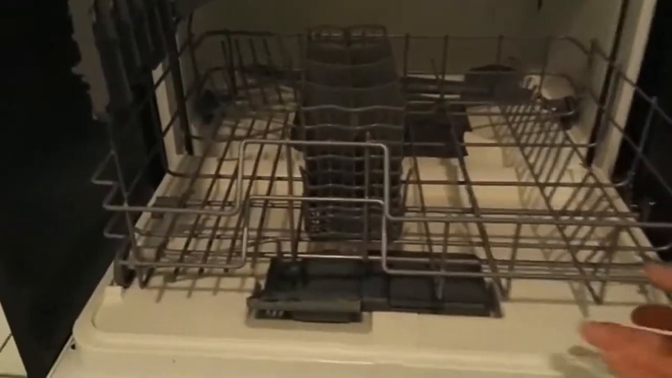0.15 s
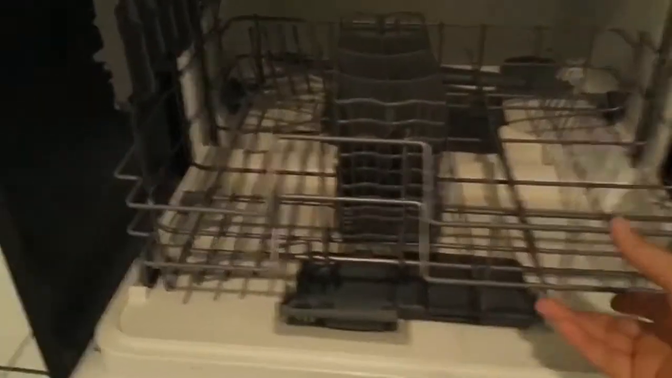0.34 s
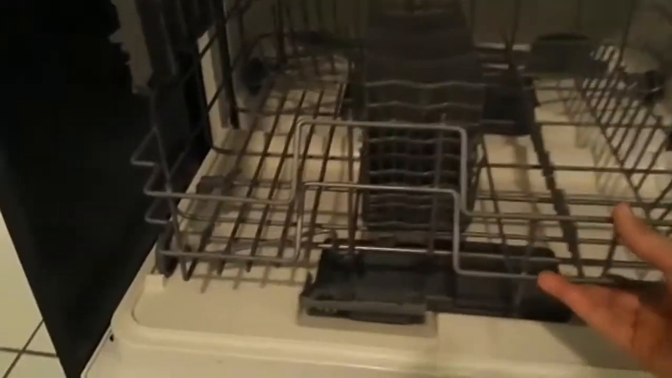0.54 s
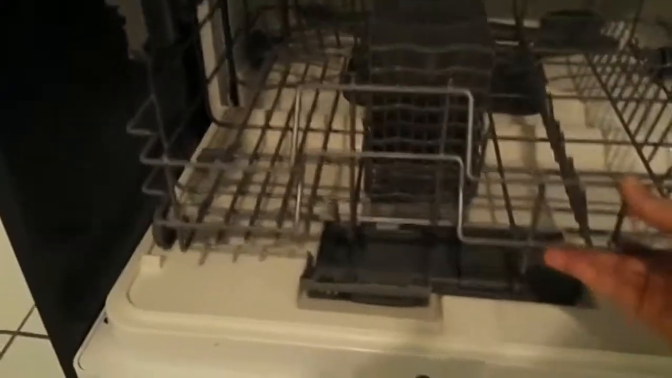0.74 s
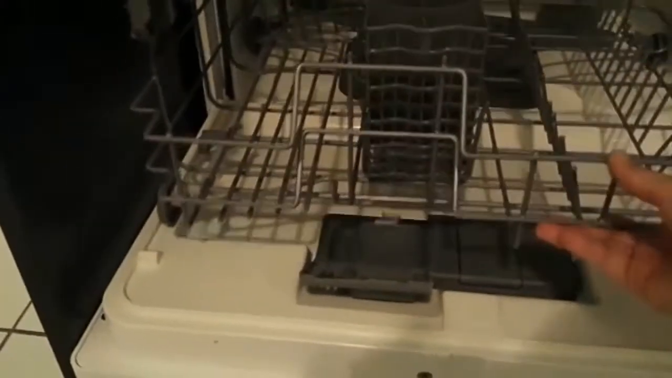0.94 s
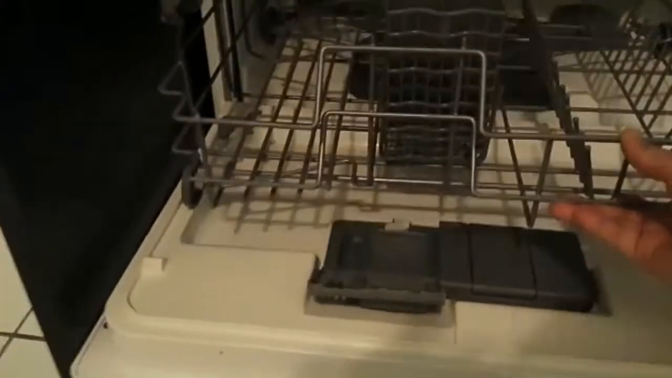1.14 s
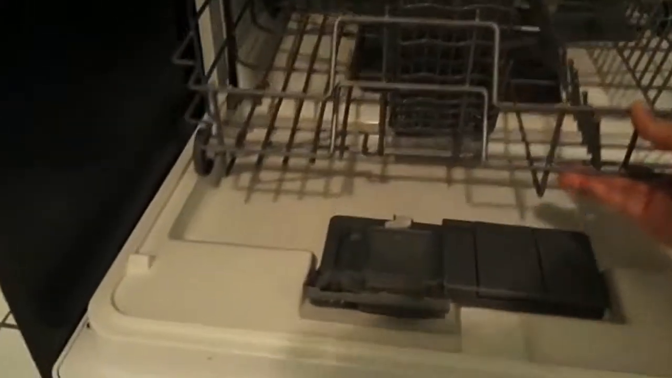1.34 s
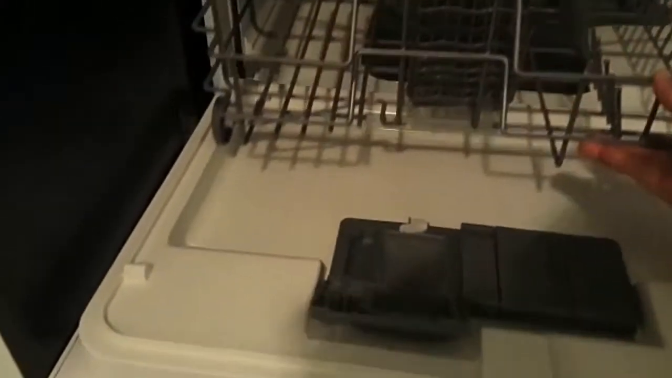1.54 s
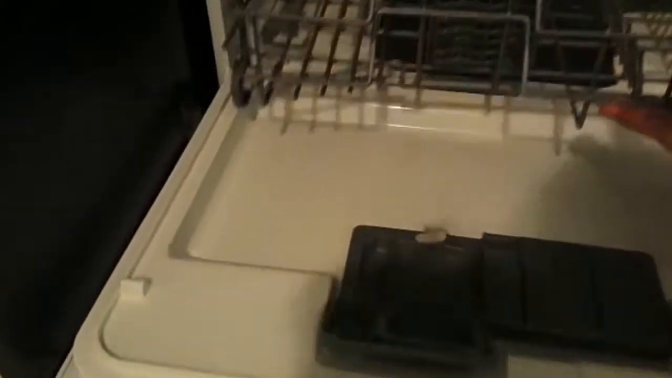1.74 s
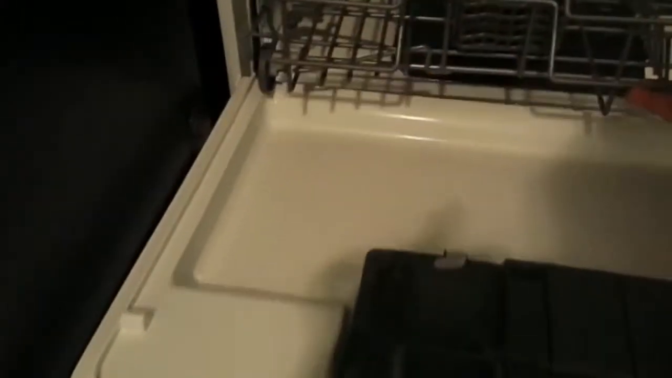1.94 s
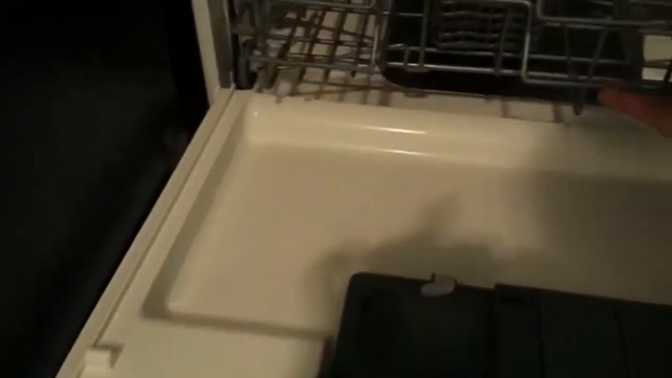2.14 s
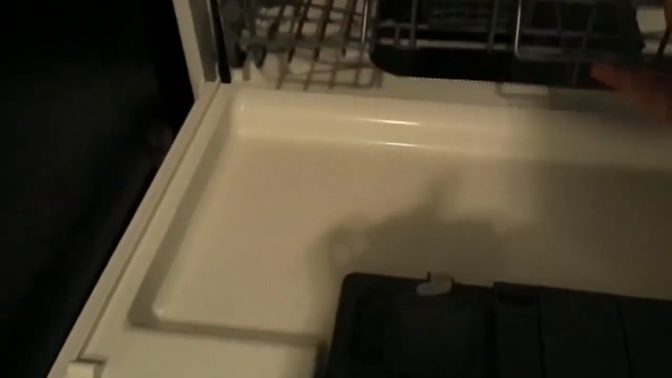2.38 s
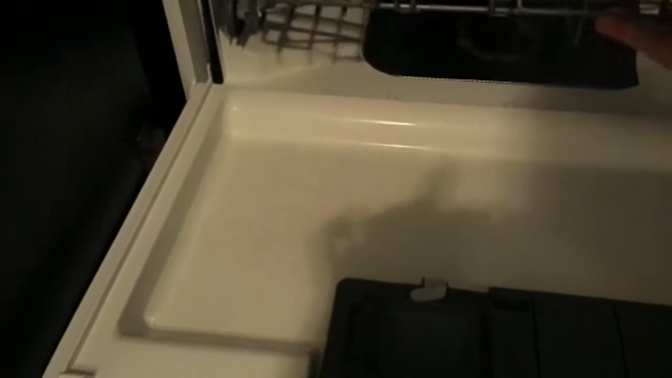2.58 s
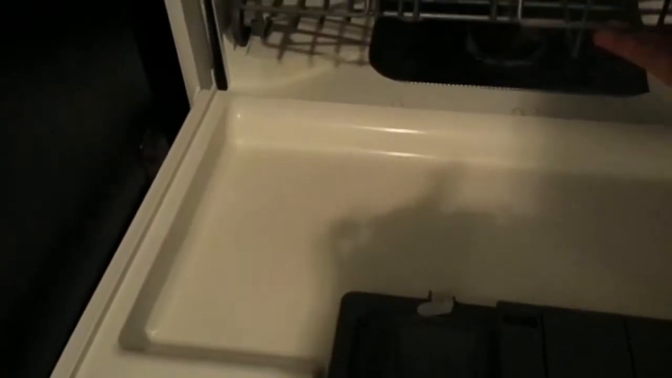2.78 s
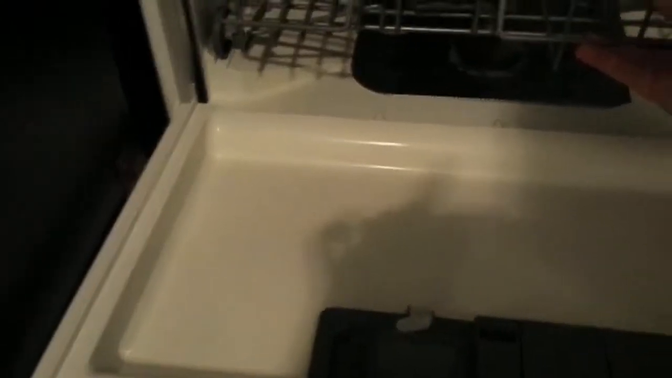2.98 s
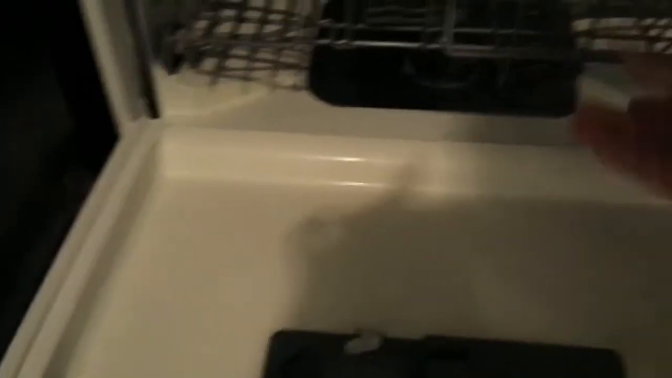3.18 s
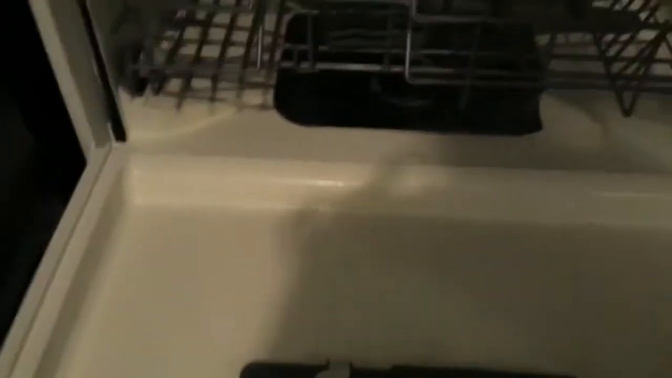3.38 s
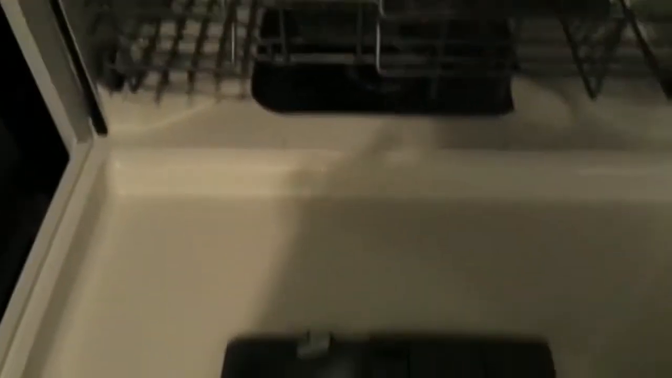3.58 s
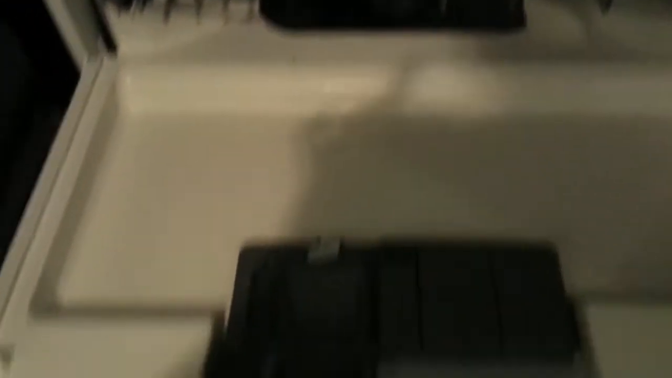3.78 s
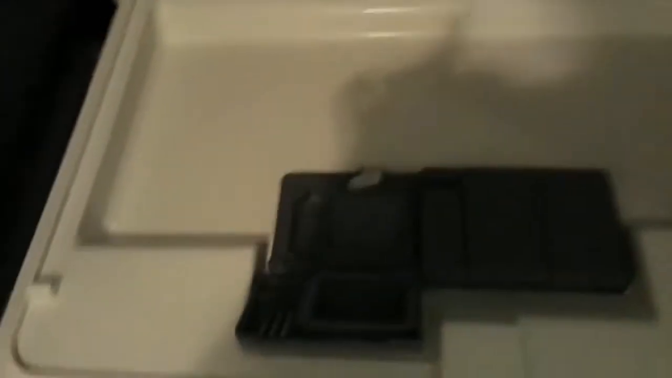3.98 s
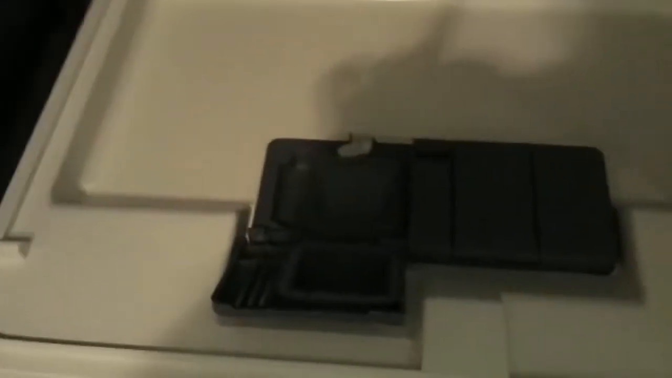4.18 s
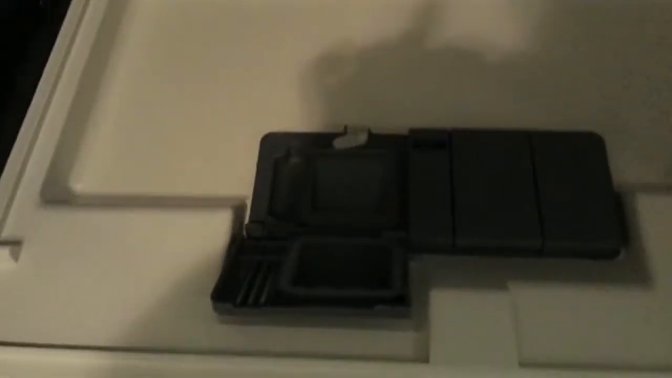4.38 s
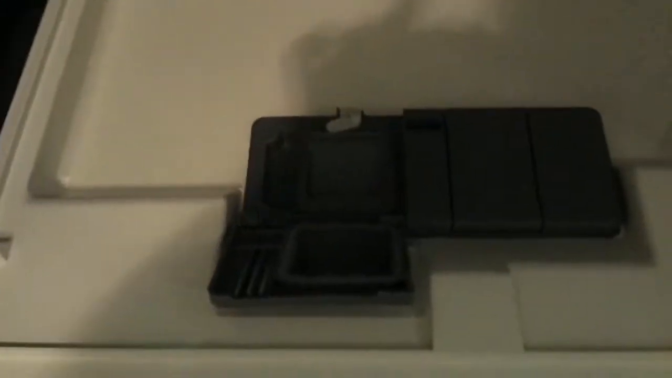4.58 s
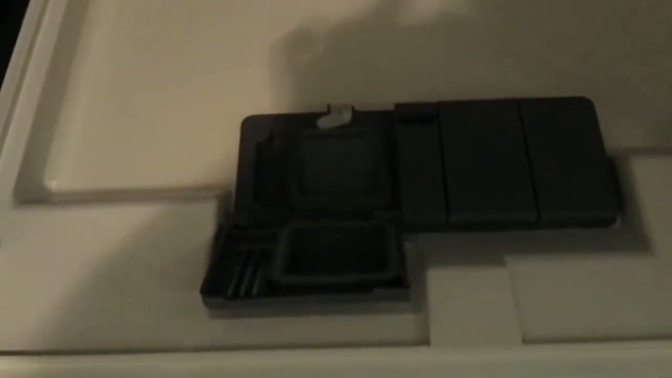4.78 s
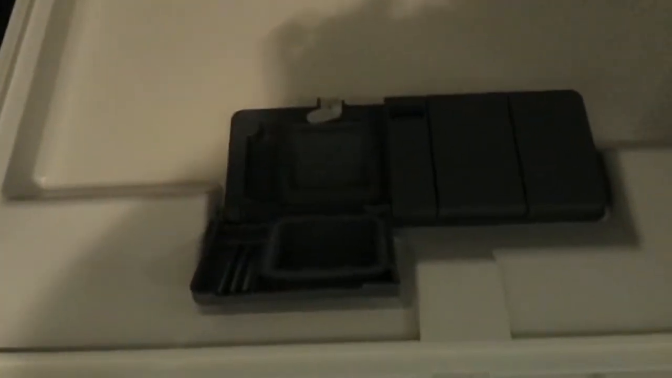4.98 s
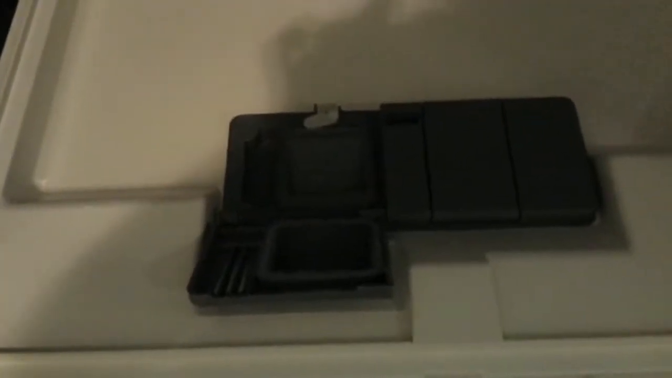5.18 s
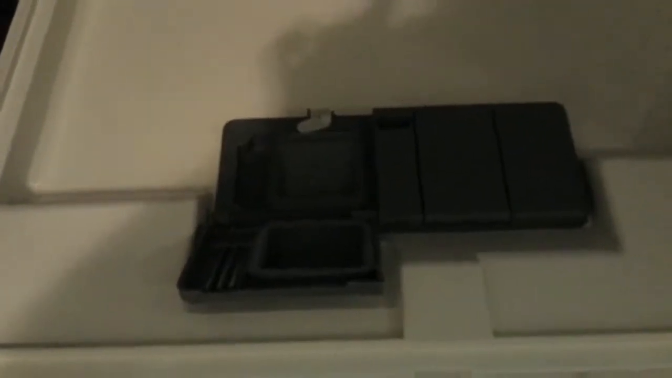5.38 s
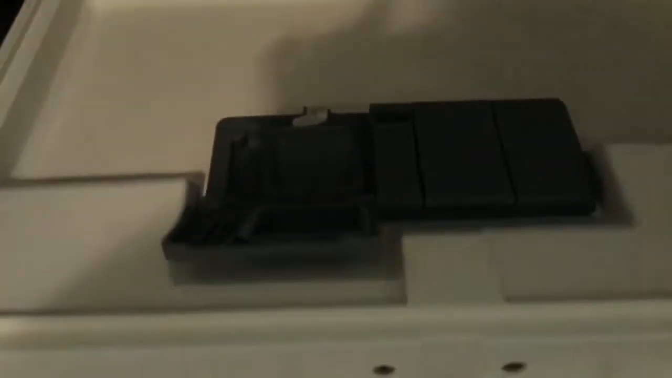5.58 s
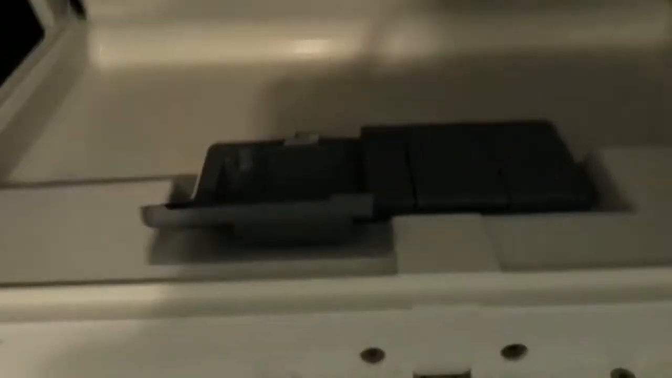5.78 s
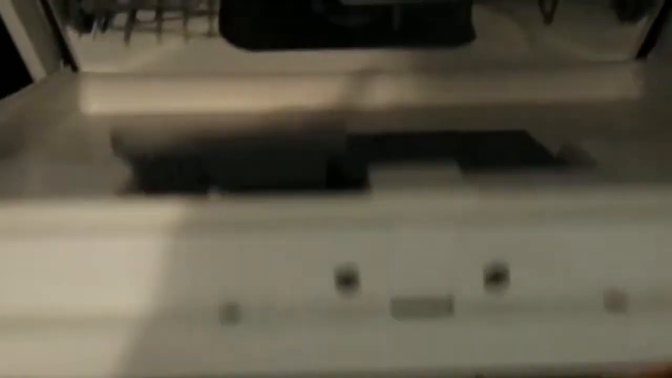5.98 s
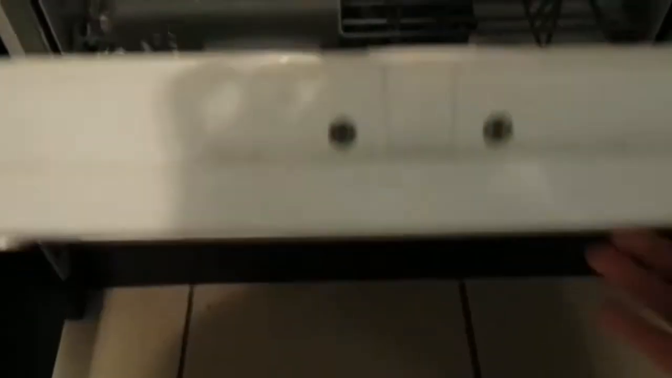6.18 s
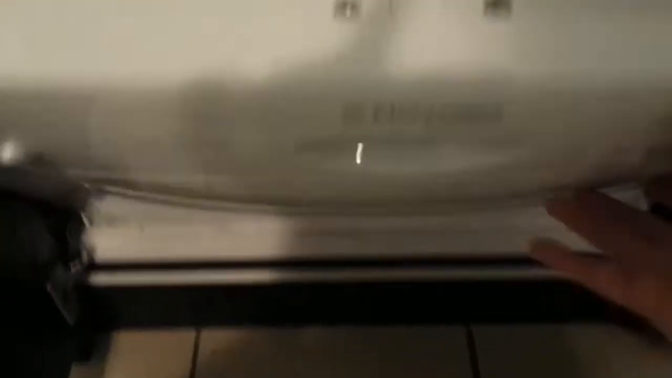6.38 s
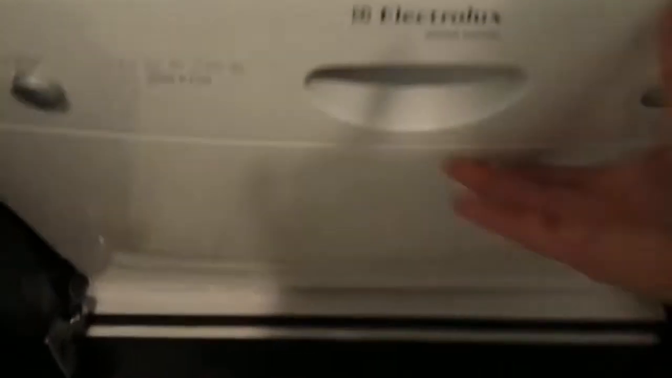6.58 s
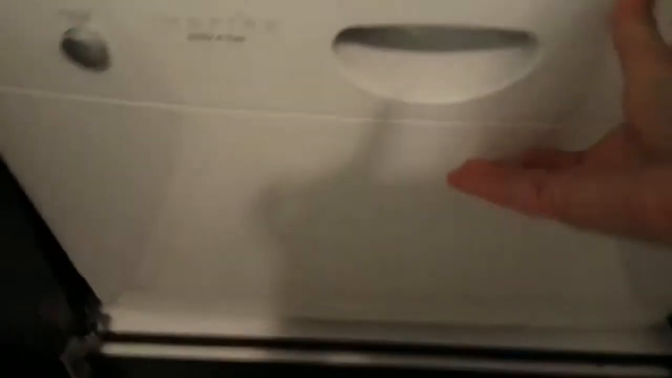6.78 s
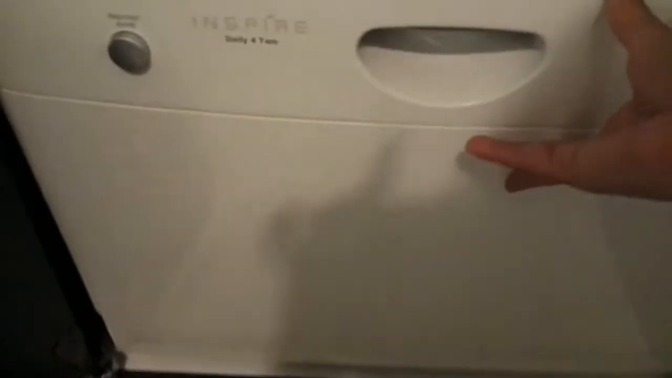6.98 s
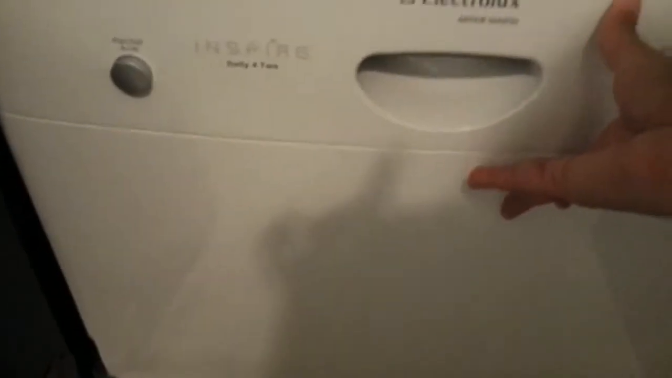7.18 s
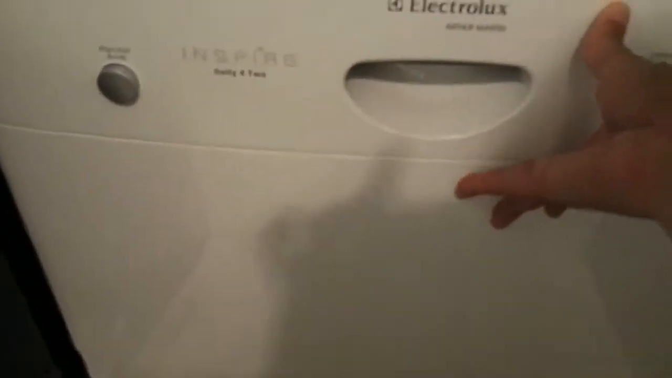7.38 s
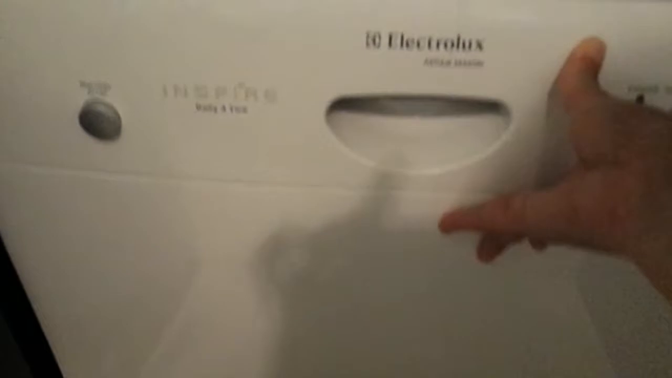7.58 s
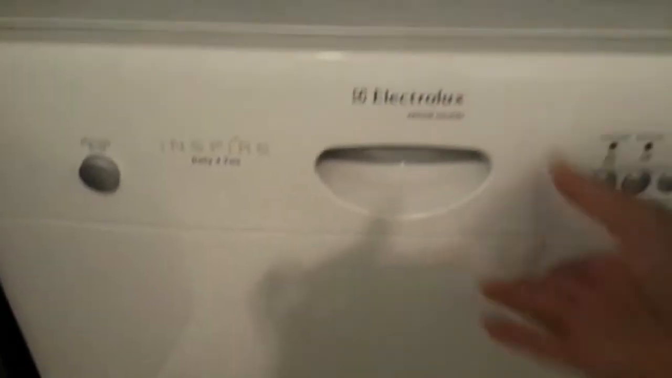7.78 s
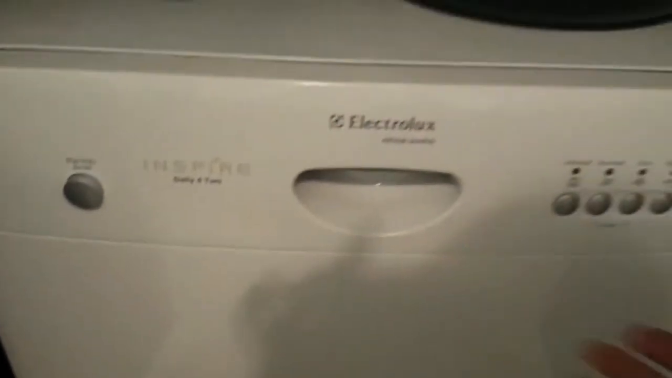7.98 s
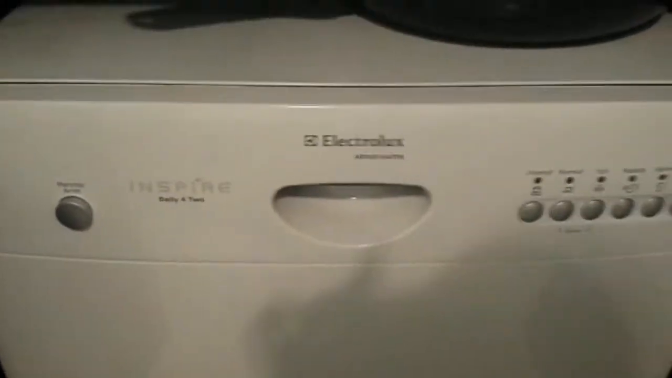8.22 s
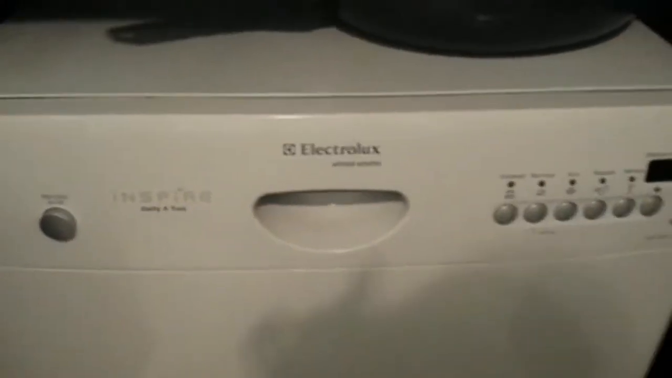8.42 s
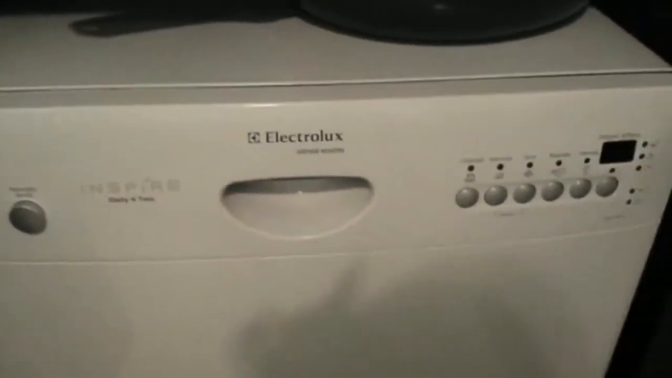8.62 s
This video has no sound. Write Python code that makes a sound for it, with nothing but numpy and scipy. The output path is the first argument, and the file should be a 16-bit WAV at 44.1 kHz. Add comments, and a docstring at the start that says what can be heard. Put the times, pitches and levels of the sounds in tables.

```python
"""A dishwasher's wire rack rolls in on plastic wheels, clashes over the sill and hits the back of the tub.
Then the door swings up with a scraping spring and a squeaking hinge, touches the catch and latches.
Contacts are bursts of noise with damped modes; moving parts are noise that follows their speed; the hinge
is a gliding tone with overtones. Fingers brush the panel. The place is a quiet kitchen, in stereo."""
import sys
import numpy as np
from scipy import signal
from scipy.fft import rfft, irfft, next_fast_len
from scipy.io import wavfile
from scipy.ndimage import map_coordinates

SR = 44100
rng = np.random.default_rng(int(sys.argv[2]) if len(sys.argv) > 2 else 0)


def dump(signal):
    """Clip the signal to [-1, 1] and save it as 16-bit WAV at the path in sys.argv[1]."""
    limited = np.clip(np.atleast_2d(signal).T, -1, 1)
    pcm = np.round(limited * 32767).astype(np.int16)
    wavfile.write(sys.argv[1], SR, pcm)


N = 381465
TOP_HZ = 15850  # upper limit of the microphone's range
JUDDER_S = 5.66  # the door leaves its rest

# the basket clashing on the sill and the back wall: start_s, level_db, hardness_db, hollowness_db
RACK_HITS = [(2.349, -28.5, 9.5, 2), (2.354, -28.5, 8, -1.5), (2.372, -28.5, 2.5, 7),
             (2.393, -19.5, 11.5, 8.5), (2.4, -21, 0.5, 6.5), (2.427, -26, 6.5, -3), (2.444, -26.5, -2, -2),
             (2.481, -29, -7, 8), (2.54, -46.5, -7.5, 2.5), (2.623, -32.5, -14, 10), (2.644, -44, 6, 0),
             (2.673, -47.5, -0.5, -4), (2.729, -43, -2, -0.5), (2.781, -42, 10, -7.5),
             (2.7915, -21, -2, -1), (2.822, -39, -7.5, 6), (2.843, -30, -11, 0.5), (2.87, -36.5, 2.5, 0),
             (2.877, -31.5, 9.5, -1.5), (2.9, -22.5, -1, 4.5), (2.919, -26.5, -1, 2.5),
             (2.964, -42.5, 0, 0), (3.151, -47, -14, 7), (3.301, -43, 3.5, 6.5)]
# the basket's own voice: thud_db, knock_db, clack_db, chink_db
RACK_VOICE = (0.87, 0.39, 0.59, -0.78)
# spectrum of the basket's blows and ticks: freq_hz, level_db
RACK_COLOUR = [(24, -34.5), (40, -25), (81, -6.5), (127, -5), (189, -11), (422, -13), (542, -23.5),
               (790, -13), (1270, -16.5), (2700, -19), (3300, -30.5), (5720, -22), (8990, -42),
               (14100, -44), (16000, -54.5)]
# resonances of the door's counter-spring: freq_hz, width_hz, lift_db
SPRING_PEAKS = [(810, 30, 5.5), (1010, 50, 1.5), (1540, 27, 8), (2010, 24, 8.5), (2270, 40, 5.5),
                (2620, 93, 8), (3078, 40, 7), (4590, 100, 6), (5090, 100, 1.5), (5430, 84, 7.5),
                (5570, 50, 9.5), (6550, 80, 5.5)]
# likeness of the left and right channels: freq_hz, correlation (no unit)
ALIKE = [(140, 0.98), (300, 0.92), (550, 0.71), (1200, 0.082), (3000, 0.16), (8000, 0.029)]


def amp(db):
    """Decibels to gain."""
    return 10 ** (np.asarray(db) / 20)


def unit(x):
    """Scaled to rms 1."""
    return x / np.sqrt(np.mean(x ** 2) + 1e-20)


def onset_rms(x):
    """The rms of the first 20 ms."""
    return np.sqrt(np.mean(x[:, :SR // 50] ** 2) + 1e-12)


def along(points, hz):
    """(Hz, value) points read on a log frequency axis."""
    f, v = np.transpose(points)
    return np.interp(np.log(hz + 1), np.log(f + 1), v)


def curves(rows):
    """One value per sample for each column after the time."""
    s, *cols = np.transpose(rows)
    return [np.interp(np.arange(N) / SR, s, c) for c in cols]


def during(rows, fade):
    """One while a curve lasts, fading to zero over fade seconds outside."""
    t = np.arange(N) / SR
    inside = np.minimum(t - rows[0][0], rows[-1][0] - t)
    return np.clip(1 + inside / fade, 0, 1)


def wobble(rate, size=N):
    """A smooth random curve, rate knots a second."""
    knots = rng.standard_normal(int(size * rate / SR) + 4)
    return map_coordinates(knots, [np.arange(size) * rate / SR])


def swell(s, length):
    """A stroke that rises and falls smoothly around its middle."""
    return np.exp(-np.minimum((2 * (np.arange(N) / SR - s) / length) ** 2, 50))


def glide(s, hz, octaves_per_s):
    """A pitch that slides steadily through hz at time s, an octave at most either way."""
    return hz * 2 ** np.clip(octaves_per_s * (np.arange(N) / SR - s), -1, 1)


def filtered(x, response):
    """x times a response of frequency."""
    m = next_fast_len(x.shape[-1] + 2048)
    return irfft(rfft(x, m) * response(np.fft.rfftfreq(m, 1 / SR)), m)[..., :x.shape[-1]]


def band(hz, low_hz, high_hz, order=8):
    """Gain of a pass band with steep skirts."""
    return ((1 + (low_hz / (hz + 1)) ** order) * (1 + (hz / high_hz) ** order)) ** -.5


def lift(peaks, hz):
    """Gain of narrow resonances that stand above a flat response."""
    return 1 + sum((amp(db) - 1) / (1 + ((hz - centre) / (.5 * width)) ** 2) for centre, width, db in peaks)


def noise(colour, low_hz, high_hz, size, peaks=()):
    """Coloured stereo noise of rms 1, alike in both channels in the bass, with any narrow resonances."""
    def response(hz):
        turn = np.arccos(np.clip(along(ALIKE, hz), -1, 1)) / 2
        shape = amp(along(colour, hz)) * lift(peaks, hz) * band(hz, low_hz, high_hz)
        return shape * np.array([np.cos(turn), np.sin(turn)])
    mid, side = filtered(rng.standard_normal((2, size)), response)
    return unit(np.array([mid + side, mid - side]))


def add(track, s, sound):
    """Mix a sound into the track at s seconds."""
    part = track[:, round(s * SR):][:, :sound.shape[1]]
    part += sound[:, :part.shape[1]]


def ringing(modes, t):
    """Damped modes at fresh strengths, (mode, channel, time); high ones are out of step left to right."""
    hz, db, t60 = np.transpose(modes)
    chance = rng.standard_normal((len(hz), 3))
    spread = np.arccos(np.clip(along(ALIKE, hz), -1, 1)) / 2 * np.sign(chance[:, 0])
    turn = np.exp(1j * (np.pi * chance[:, 1:2] + spread[:, None] * [1, -1]))
    decay = amp((db + 2 * chance[:, 2])[:, None] - 60 * t / t60[:, None])
    waves = decay * np.exp(2j * np.pi * hz[:, None] * t)
    return (turn[:, :, None] * waves[:, None]).imag


def echoed(x, t60, echo_db):
    """The direct sound plus the dense decaying echo of a cavity too small to hold bass."""
    # spectrum of the echo: freq_hz, level_db
    echo_colour = [(300, 1.5), (14000, 1.5)]
    t = np.arange(SR // 3) / SR
    tail = noise(echo_colour, 1100, 16000, len(t)) * amp(-60 * t / t60)
    tail = tail / np.linalg.norm(tail[0])
    return x + amp(echo_db) * signal.fftconvolve(np.atleast_2d(x), tail, axes=1)[:, :N]


def register_levels(voice, level_db, hardness_db, hollowness_db):
    """A hard contact tilts the part's voice towards the chink; a hollow one favours knock and clack."""
    tilt = np.linspace(-1, 1, 4)
    middle = np.array([-1, 0, 0, -1])
    return level_db + np.array(voice) + hardness_db * tilt + hollowness_db * middle


def contacts(hits, voice, modes, colour, ring_db, echo_db, blow_length, grit_db):
    """Each contact is a gritty blow, the ring of the struck part and an echo, in four registers."""
    # thud, knock, clack and chink: low_hz, high_hz, rise_s, blow_t60_s, echo_t60_s, echo_db, ring_db
    registers = [(54.6, 240, 0.003, 0.12, 0.6, -4, -4), (198, 725, 0.00081, 0.19, 0.46, -8.5, -1),
                 (710, 3000, 0.00029, 0.11, 0.4, -15.5, -0.5), (3140, 37000, 0.0026, 0.01, 0.18, -21, -17)]
    halving_hardness_db = 22  # a contact this much harder dies in half the time
    grit_rise_s = 0.0099  # a blow lands clean, then loose parts start chattering
    mode_lift_db, mode_width_hz = 4.5, 22  # the blow is louder near the modes of the struck part
    track, t = np.zeros((2, N)), np.arange(SR * 2 // 5) / SR
    mode_hz = np.transpose(modes)[0]
    for s, level_db, hardness_db, hollowness_db in hits:
        levels = register_levels(voice, level_db, hardness_db, hollowness_db)
        length = blow_length * 2 ** (-hardness_db / halving_hardness_db)
        rings = ringing(modes, t)
        grit = unit(amp(grit_db * wobble(450, size=len(t))))
        grit = 1 + (grit - 1) * np.minimum(t / grit_rise_s, 1)
        for db, (low_hz, high_hz, rise, blow_t60, echo_t60, room_db, modes_db) in zip(levels, registers):
            inside = (mode_hz >= low_hz) & (mode_hz < high_hz)
            peaks = [(hz, mode_width_hz, mode_lift_db) for hz in mode_hz[inside]]
            impact = grit * amp(-60 * t / (blow_t60 * length))
            echo = amp(room_db + echo_db - 60 * t / echo_t60)
            blow = (impact + echo) * noise(colour, low_hz, high_hz, len(t), peaks)
            blow = filtered(blow, lambda hz: band(hz, 38, 2 * high_hz))
            ring = rings[inside].sum(0)
            sound = blow / onset_rms(blow) + amp(ring_db + modes_db) * ring / onset_rms(ring)
            sound = sound * (1 - np.exp(-(t / rise) ** 2))  # heavy panels start slowly
            add(track, s, amp(db) * sound / onset_rms(sound))
    return track


def rattle(hits, voice, rattle_db, count):
    """Each contact opens with a thin tick and throws loose wires and clips, which ping at random just after."""
    delay_s, middle_hz, octaves, ping_t60_s = .022, 2288, 1.2, 0.063  # delay is the scale of a random wait
    tick_db, tick_growth, tick_t60_s = -4.5, 0.98, 0.0059  # against the chink; dB more per dB of hardness
    track, t = np.zeros((2, N)), np.arange(SR // 10) / SR
    for s, level_db, hardness_db, hollowness_db in hits:
        *_, clack_db, chink_db = register_levels(voice, level_db, hardness_db, hollowness_db)
        fall = amp(chink_db + tick_db + tick_growth * hardness_db - 60 * t / tick_t60_s)
        add(track, s, fall * noise(RACK_COLOUR, 5400, 15000, len(t)))
        for wait, pitch, size in rng.standard_normal((count, 3)):
            hz = middle_hz * 2 ** (octaves * np.tanh(pitch))
            ping = (hz, clack_db + rattle_db + 2 * size, ping_t60_s)
            add(track, s + delay_s * abs(wait), ringing([ping], t)[0])
    return track


def sliding(motion, shaking, colour, rumble_db, rumble_growth, scrape_db, rumble_hz, lumpy_db,
            grain_db, grain_rate, peaks=()):
    """A lumpy panel rumble under a grainy scrape; both grow with speed, and shaking adds rumble."""
    speed_db, = curves(motion)
    pressure_db = 1.2 * wobble(14)
    rumble = unit(noise(colour, 35, rumble_hz, N) * amp(lumpy_db * wobble(45)))
    scrape = unit(noise(colour, 830, 10000, N, peaks) * amp(grain_db * wobble(grain_rate)))
    rumble_gain = np.hypot(amp(rumble_db + rumble_growth * speed_db), shaking)
    moving = rumble_gain * rumble + amp(scrape_db + speed_db) * scrape
    return during(motion, 1.0) * amp(pressure_db) * moving


def ticking(motion, rate, level_db, scatter_db, middle_hz, octaves, t60):
    """Small parts tick at random in a motion, 200 times at most, harder with speed up to 0 dB."""
    track, t = np.zeros((2, N)), np.arange(SR // 32) / SR
    times, speeds_db = np.transpose(motion)
    s = times[0]
    for wait, size, *pitches in rng.standard_normal((200, 7)):
        s += wait ** 2 / rate
        if s < times[-1]:
            db = level_db + min(np.interp(s, times, speeds_db), 0) + scatter_db * size
            modes = [(min(middle_hz * 2 ** (octaves * p), TOP_HZ), db, t60) for p in pitches]
            add(track, s, ringing(modes, t).sum(0))
    return track


def kitchen():
    """The room's low noise and faint hiss, drifting slightly in level."""
    # spectrum of the room: freq_hz, level_db
    room_colour = [(15, -47.5), (25, -16), (92, -5.5), (130, -11), (157, -9.5), (270, -8), (344, -14.5),
                   (451, -12), (695, -20.5), (863, -24), (1370, -27.5), (1650, -26.5), (5000, -26),
                   (8000, -34), (16000, -42.5)]
    level_db, drift_db = -57.6, .6
    return amp(level_db + drift_db * wobble(0.5)) * noise(room_colour, 20, 16000, N)


def fingers():
    """Skin hisses lightly over the smooth door panel."""
    # fingers brushing over the door: middle_s, length_s, level_db
    brushes = [(5.85, 0.046, -55), (5.917, 0.056, -51), (6.319, 0.61, -56), (6.642, 0.1, -53),
               (6.687, 0.023, -50.5), (6.839, 0.12, -48)]
    # spectrum of the hiss: freq_hz, level_db
    skin = [(3000, -8), (7000, -1.5), (10000, -11), (14500, -5.5)]
    strokes = sum(amp(db) * swell(s, length) for s, length, db in brushes)
    return strokes * noise(skin, 3100, 16000, N)


def clicks():
    """Two wires meet with a dry, bright click and a faint echo from the tub."""
    # bare wire tapping on wire: start_s, level_db, t60_s
    taps = [(0.734, -57, .03), (2.203, -41.5, 0.017), (2.844, -29.5, 0.0097), (3.5635, -28.5, 0.0071)]
    # spectrum of a click: freq_hz, level_db
    click_colour = [(1500, -11.5), (3600, -11.5), (4500, 0), (6500, 1.5), (8000, -24.5), (15000, -22)]
    track, t = np.zeros((2, N)), np.arange(SR // 20) / SR
    for s, db, t60 in taps:
        add(track, s, amp(db - 60 * t / t60) * noise(click_colour, 1200, 15500, len(t)))
    return echoed(track, t60=.11, echo_db=-4.5)


def twangs():
    """Each wire, panel or spring rings in two planes at slightly different pitches, so that it beats."""
    # thin wires, panels and the latch spring: start_s, pitch_hz, level_db, rise_s, t60_s
    plucks = [(0.985, 1400, -36, 0.0012, .07), (1.138, 1363, -39, 0.00092, .08),
              (1.266, 1325, -44.5, .002, .1), (1.266, 920, -41, .002, 0.11), (1.225, 257, -29, 0.026, 0.17),
              (2.351, 1132, -11.5, 0.00087, 0.052), (2.4, 807, -27, .002, 0.13),
              (2.405, 91.3, -17, .008, 0.39), (2.623, 718, -22.5, 0.0012, 0.085),
              (2.623, 550, -19.5, 0.0021, 0.049), (2.626, 292, -32, .002, 0.14),
              (2.869, 4460, -22.5, .001, 0.044), (2.9, 1790, -33, .003, 0.27),
              (2.9, 134.5, -10.5, .002, 0.11), (2.96, 98, -11.5, 0.0052, 0.122),
              (3.3, 1260, -42, .002, .09), (3.302, 358, -24.5, 0.012, 0.21), (3.308, 728, -27, 0.013, 0.22),
              (3.31, 1475, -50.5, 0.012, 0.35), (5.301, 258, -34, 0.0011, 0.19),
              (5.3, 356, -38, 0.0018, .13), (5.301, 740, -39, 0.00081, 0.047),
              (5.302, 1090, -42.5, 0.0011, 0.053), (6.318, 1174, -36, .002, 0.1),
              (6.325, 399.4, -34.5, 0.0043, 0.18), (7.372, 2820, -16.5, 0.00055, 0.071),
              (7.391, 1223, -17, 0.0017, 0.15), (7.411, 488, -20.5, .004, 0.21),
              (7.397, 778, -19, .003, .16), (7.4, 6520, -41, .003, 0.77)]
    track, t = np.zeros((2, N)), np.arange(SR // 2) / SR
    for s, hz, db, rise, t60 in plucks:
        planes = [(hz, db, t60), (hz + 22, db - 5.5, t60)]
        add(track, s, ringing(planes, t).sum(0) * (1 - np.exp(-t / rise)))
    return track


def hinge():
    """Stick and slip in the dry hinge: a fluttering, falling chirp, then a clean note that swells and echoes."""
    # the hinge catches high and chirps downwards: time_s, pitch_hz, level_db, octave_db, roughness (0-1)
    chirp = [(6.786, 3860, -44, -4, 0.5), (6.797, 3480, -35, -14, 0.36), (6.803, 3250, -38.5, 7.5, 0.65),
             (6.81, 3030, -33.5, 2, 0.7), (6.816, 2610, -33.5, -9.5, .6), (6.838, 2470, -43.5, -16.5, 0.5)]
    # it settles into a cleaner lower note: time_s, pitch_hz, level_db, octave_db, roughness (0-1)
    note = [(6.829, 1570, -46, -12, .2), (6.84, 1545, -31, -11, .25), (6.859, 1542, -29, -11, .2),
            (6.87, 1610, -20.5, -20, .05), (6.882, 1610, -22, -17, .05), (6.893, 1612, -30, -14, 0),
            (6.902, 1615, -31, -20, 0), (6.925, 1626, -50, -10, .1)]
    third_db, fall_db, fade_hz = -13, -4, 9900  # third partial against the octave; each further one; limit
    tone, t = np.zeros(N), np.arange(N) / SR
    for squeak in (chirp, note):
        gate = during(squeak, .003)
        on = gate > 0
        size = int(on.sum())
        hz, db, octave_db, rough = [column[on] for column in curves(squeak)]
        jitter = .085 * rough * wobble(1500, size=size) + .002 * wobble(500, size=size)
        pitch_hz = hz * (1 + jitter)
        phase = 2 * np.pi * np.cumsum(pitch_hz) / SR
        upper = np.zeros(size)
        for k in range(3, 10):
            audible = band(k * pitch_hz, 1, fade_hz) * (k * pitch_hz < TOP_HZ)
            upper += amp(third_db + fall_db * (k - 3)) * np.sin(k * phase) * audible
        flutter = 1 + 0.98 * rough * np.sin(2 * np.pi * 270 * t[on])
        flutter = flutter * amp(2.5 * rough * wobble(500, size=size))
        partials = np.sin(phase) + amp(octave_db) * (np.sin(2 * phase) + upper)
        tone[on] += partials * flutter * amp(db) * gate[on]
    return echoed(tone, t60=.28, echo_db=-17)


def judder():
    """The door panel shakes as it is lifted: attack, hold, release."""
    attack_s, hold_s, t60_s, level_db = 0.016, 0.3, 0.59, -39.5  # hold runs from the start of the attack
    t = np.arange(N) / SR - JUDDER_S
    return np.clip(t / attack_s, 0, 1) * amp(level_db - 60 * np.maximum(t - hold_s, 0) / t60_s)


def coils():
    """The counter-spring scrapes at once as the door leaves its rest, eases, then rubs in strokes higher up."""
    # the spring rubbing: middle_s, length_s, level_db
    rubs = [(6.15, 0.15, -50), (6.333, 0.17, -48)]
    # spectrum of the rubbing: freq_hz, level_db
    rub_colour = [(3600, -8), (4400, 1), (5600, -3.5), (6100, -7), (7500, -16)]
    # spectrum of the scraping coils: freq_hz, level_db
    coil_colour = [(1500, -12), (2000, -10), (2300, -9), (2680, -10), (2950, -12), (3600, -22)]
    scrape_db, fade_db_per_s = -10, -36  # against the panel's judder
    since = np.maximum(np.arange(N) / SR - JUDDER_S, 0)
    scrape = judder() * amp(scrape_db + fade_db_per_s * since + 1.4 * wobble(90))
    scrape = scrape * noise(coil_colour, 810, 3900, N, SPRING_PEAKS)
    strokes = sum(amp(db) * swell(s, length) for s, length, db in rubs)
    return scrape + strokes * amp(1.8 * wobble(64)) * noise(rub_colour, 3500, 8000, N, SPRING_PEAKS)


def door():
    """The door rubs on its hinges and spring as it rises, meets the catch and latches."""
    # door knocks, catch and latch: start_s, level_db, hardness_db, hollowness_db
    door_hits = [(5.283, -60, -13, 17), (5.3, -50, -16, 10), (6.3, -46, 2, 7), (6.319, -41, -8.5, 11.5),
                 (6.401, -62.5, 2, -11), (6.75, -44, 3, 6), (7.138, -33, 0, -9), (7.292, -41.5, 2.5, 12),
                 (7.372, -23, 4.5, 5.5), (7.386, -21, 2.5, -2.5), (7.392, -14, 5, 2.5),
                 (7.399, -16.5, 0, 6), (7.424, -23.5, -7.5, 8.5), (7.451, -27, 5.5, 5),
                 (7.507, -41.5, 4.5, -3.5), (7.549, -44, 0, 2.5)]
    # the door's own voice: thud_db, knock_db, clack_db, chink_db
    door_voice = (-1.2, 0.47, -2.1, 0.11)
    # modes of the door panel: freq_hz, level_db, t60_s
    door_modes = [(92.4, -5, 0.26), (112.6, -2.5, 0.34), (278, -7, 0.29), (315, -5.5, 0.31),
                  (357, 2.5, 0.35), (438, -8, 0.32), (492, 2, 0.24), (607, -10, 0.13), (770, -5, 0.23),
                  (996, -13, 0.18), (1206, -6, 0.16), (1410, -15, 0.25), (1584, -9.5, 0.13),
                  (1804, -15.5, 0.24), (2250, -13.5, 0.18), (2430, -15, 0.27), (2720, -12, 0.35),
                  (2830, -17.5, .24), (3110, -14.5, 0.1), (3770, -24, 0.14), (4300, -15.5, 0.15),
                  (5100, -18, 0.12)]
    # spectrum of its blows: freq_hz, level_db
    door_colour = [(40, -0.5), (70, 5), (124, -4), (185, -4.5), (354, -4), (556, -7.5), (770, -4),
                   (1240, -9), (1900, -9), (2800, -16.5), (3600, -27.5), (6300, -25), (7700, -37),
                   (14000, -42.5), (15500, -53.5)]
    # the door swings up, then eases on to the catch: time_s, speed_db
    swing = [(5.42, -25), (5.64, -9), (5.79, -7), (5.88, 0.5), (6.03, -4.5), (6.33, -3.5), (6.6, -10.5),
             (6.92, -6), (7.3, -15)]
    # spectrum of the swing: freq_hz, level_db
    swing_colour = [(21, -47), (35, -14), (77, 0.5), (195, -1.5), (258, -1.5), (370, -3.5), (503, -4.5),
                    (1400, -22), (2660, -22), (3620, -24), (5180, -21.5), (8430, -33), (14800, -32.5),
                    (16000, -43)]
    rubbing = sliding(swing, amp(-2.0) * judder(), swing_colour, rumble_db=-47.5, rumble_growth=0.57,
                      scrape_db=-45.0, rumble_hz=384, lumpy_db=3.0, grain_db=1.5, grain_rate=87,
                      peaks=SPRING_PEAKS)
    groan = amp(-7.0) * judder() * noise(swing_colour, 310, 340, N)
    knocks = contacts(door_hits, door_voice, door_modes, door_colour,
                      ring_db=-5.0, echo_db=-3.0, blow_length=1.03, grit_db=2.0)
    clips = rattle(door_hits, door_voice, rattle_db=-5.5, count=3)
    # dry slips of the rising door
    slips = ticking(swing, rate=45, level_db=-54, scatter_db=4, middle_hz=3332, octaves=0.82, t60=.014)
    return rubbing + slips + groan + coils() + amp(-4.0) * knocks + amp(0.5) * clips


def shudder():
    """Every thud of the basket adds to a shaking that dies away slowly."""
    shake_db, t60_s = -19, 2.26  # level against the thud
    t, power = np.arange(N) / SR, np.zeros(N)
    for s, *strike in RACK_HITS:
        thud_db = register_levels(RACK_VOICE, *strike)[0]
        after = t > s
        power[after] += amp(thud_db + shake_db - 60 * (t[after] - s) / t60_s) ** 2
    return np.sqrt(power)


def singing(strokes, flutter_rate, chatter_db):
    """Friction feeds a band of noise that slides in pitch and chatters in level."""
    carrier = np.zeros(N, complex)
    for s, length, hz, slope, db in strokes:
        phase = 2 * np.pi * np.cumsum(glide(s, hz, slope)) / SR
        carrier += amp(db) * swell(s, length) * np.exp(1j * phase)
    channels = np.array([wobble(flutter_rate) + 1j * wobble(flutter_rate) for _ in range(2)])
    return (carrier * channels).real * unit(amp(chatter_db * wobble(64)))


def wheels():
    """Plastic wheels roll over the door, knock on its ridges and sing on their axles."""
    # the rack gathers speed up to the sill, then creeps home: time_s, speed_db
    roll = [(0.75, -21), (1.2, -18.5), (1.65, -17.5), (2.0, -7.5), (2.3, -7.5), (2.5, 2), (3.0, -14),
            (3.65, -12), (3.92, -15)]
    # spectrum of the rolling: freq_hz, level_db
    roll_colour = [(21, -47), (35, -16.5), (103, -2.5), (167, -19.5), (233, -7), (301, -15.5), (410, -11.5),
                   (543, -19), (979, -23.5), (1370, -24.5), (3620, -26.5), (6000, -21.5), (7050, -32.5),
                   (16000, -31)]
    # wheels dropping over ridges in the door: start_s, level_db, hardness_db, hollowness_db
    wheel_hits = [(0.984, -40, 4.5, 20), (1.136, -46.5, -2, 13), (1.266, -52, -17.5, 22),
                  (1.304, -64, -5, -9), (1.659, -59, 4.5, 1), (1.822, -48.5, -5.5, -5.5),
                  (1.939, -57, -3, 2.5), (2.049, -40, -2, 4), (2.154, -51, -3, 3), (2.177, -46.5, 3.5, 5),
                  (2.202, -46, 1, -7), (2.247, -55, 7.5, 1)]
    # the wheels' own voice: thud_db, knock_db, clack_db, chink_db
    wheel_voice = (0, 3.5, 4, 0)
    # modes set off by the wheels: freq_hz, level_db, t60_s
    wheel_modes = [(258.3, -7.5, 0.53), (439, 0, 0.14), (770, -74, 0.05), (930, -32.5, 0.048),
                   (1348, 1, 0.049), (1916, 3.5, 0.035), (2234, -5, 0.055), (2640, -5.5, 0.083)]
    # spectrum of their knocks: freq_hz, level_db
    wheel_colour = [(35, -37), (60, -6.5), (274, -3), (540, -13), (946, -2), (1090, -7), (1340, -7),
                    (1740, -11.5), (2140, -12.5), (3670, -19), (4030, -14.5), (6140, -14.5), (7570, -21.5),
                    (14200, -36), (16000, -45)]
    # a dry axle singing: middle_s, length_s, pitch_hz, glide_octaves_per_s, level_db
    axle = [(1.6, .06, 4500, 0, -70), (1.68, 0.079, 4600, -0.1, -68), (1.85, .05, 5760, 0.63, -57),
            (1.905, 0.078, 6530, 0.93, -57.5), (1.985, 0.07, 5340, -0.12, -61), (2.1, .13, 6280, 0.2, -59),
            (2.29, 0.21, 6260, 0, -63)]
    rolling = sliding(roll, shudder(), roll_colour, rumble_db=-42, rumble_growth=1.0, scrape_db=-43.5,
                      rumble_hz=743, lumpy_db=2.5, grain_db=0.5, grain_rate=110)
    knocks = contacts(wheel_hits, wheel_voice, wheel_modes, wheel_colour,
                      ring_db=-5, echo_db=4.5, blow_length=1.0, grit_db=0.0)
    # loose tines of the rolling basket
    tines = ticking(roll, rate=72, level_db=-57, scatter_db=2.5, middle_hz=4480, octaves=0.38, t60=0.011)
    axles = singing(axle, flutter_rate=900, chatter_db=3)
    return rolling + tines + amp(-3.5) * knocks + amp(7.5) * axles


def wires(count):
    """Every blow to the basket sets a random handful of its wires ringing."""
    low_hz, octaves, level_db, t60_s = 1298, 2.2, -19.5, 0.23  # level against the clack
    track, t = np.zeros((2, N)), np.arange(SR // 4) / SR
    for s, *strike in RACK_HITS:
        *_, clack_db, chink_db = register_levels(RACK_VOICE, *strike)
        pitches_hz = low_hz * 2 ** (octaves * rng.random(count))
        struck = [(hz, clack_db + level_db, t60_s) for hz in pitches_hz]
        add(track, s, ringing(struck, t).sum(0))
    return track


def rack():
    """The wire basket clatters over the sill and against the back of the tub."""
    # modes of the struck basket: freq_hz, level_db, t60_s
    rack_modes = [(94.3, -1, 0.69), (131, -2.5, 0.22), (269.2, -9.5, 0.55), (391.6, -13, 0.085),
                  (487.6, -2.5, 0.12), (582, -13.5, 0.29), (749, -10, 0.34), (814, -14.5, 0.37),
                  (940, -6, 0.24), (1171, -10.5, 0.31), (1550, -10, 0.4), (1780, -6.5, 0.15),
                  (2370, -18, 0.26), (2800, -10.5, 0.22), (3030, -14, 0.31), (4260, -13.5, 0.19),
                  (4880, -20, 0.18), (5540, -24, 0.11), (6400, -25, 0.18)]
    blows = contacts(RACK_HITS, RACK_VOICE, rack_modes, RACK_COLOUR,
                     ring_db=-4.5, echo_db=3, blow_length=1.34, grit_db=4.0)
    loose = rattle(RACK_HITS, RACK_VOICE, rattle_db=-3.5, count=3)
    return amp(-5.0) * blows + wires(count=12) + amp(-3.0) * loose


def scene():
    """Rack, door and room together; the sound leans to the right, most around 2300 Hz."""
    # stereo balance: freq_hz, left_minus_right_db
    balance = [(100, -1.2), (500, -0.85), (1200, -2.5), (2300, -7), (4000, -0.5), (12000, -0.9)]
    machine = amp(0.05) * (wheels() + rack() + door())
    mix = machine + clicks() + twangs() + hinge() + fingers() + kitchen()
    return filtered(mix, lambda hz: amp(along(balance, hz) * np.array([[.5], [-.5]])))


def record(dry):
    """The microphone sheds deep bass, full scale clips, the sound drops out briefly and the top is cut."""
    # the silent gap: start_s, end_s
    dropout = (7.668, 7.807)
    t = np.arange(N) / SR
    live = (t < dropout[0]) | (t > dropout[1])
    heard = signal.sosfilt(signal.butter(2, 42, "high", fs=SR, output="sos"), dry)
    return filtered(np.clip(heard, -1, 1) * live, lambda hz: hz < TOP_HZ)


dry = scene()
out = record(dry)
dump(out)
```